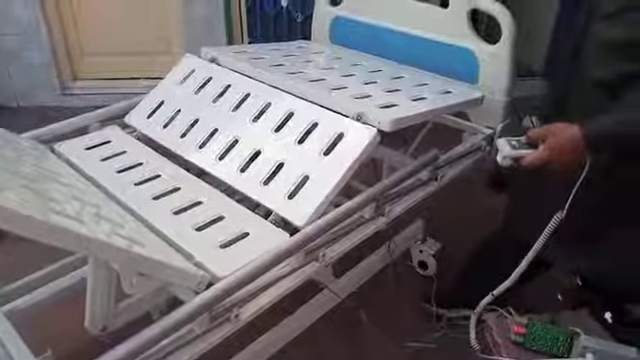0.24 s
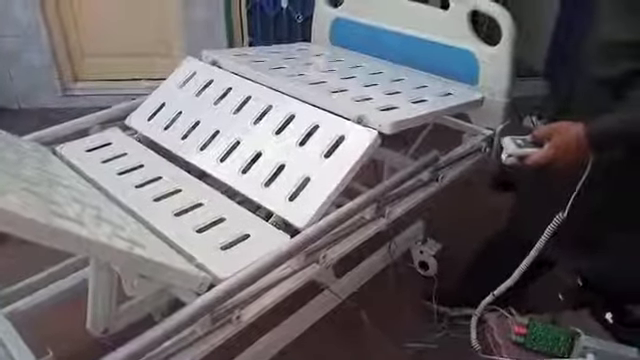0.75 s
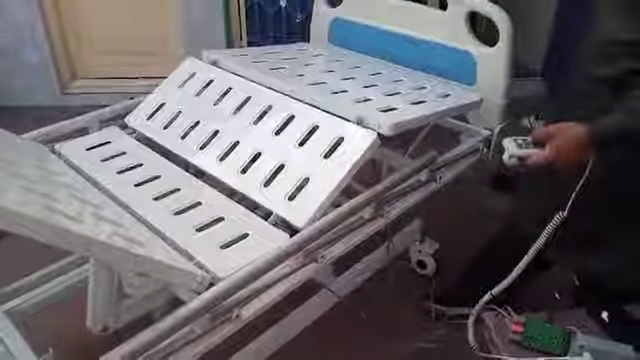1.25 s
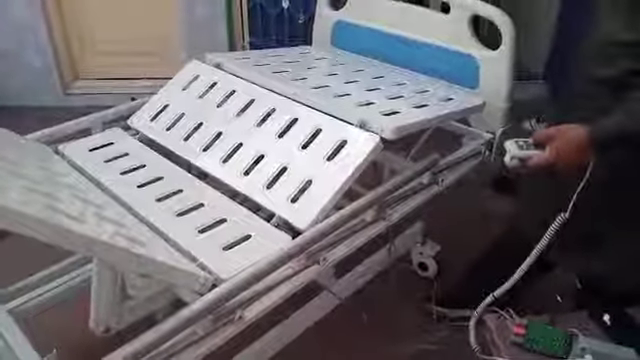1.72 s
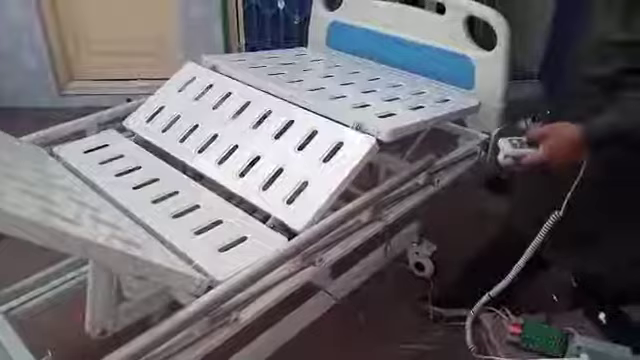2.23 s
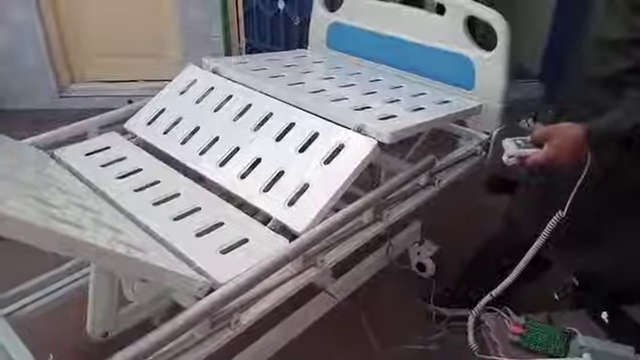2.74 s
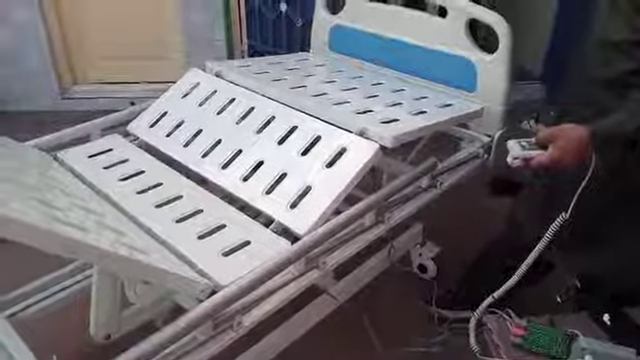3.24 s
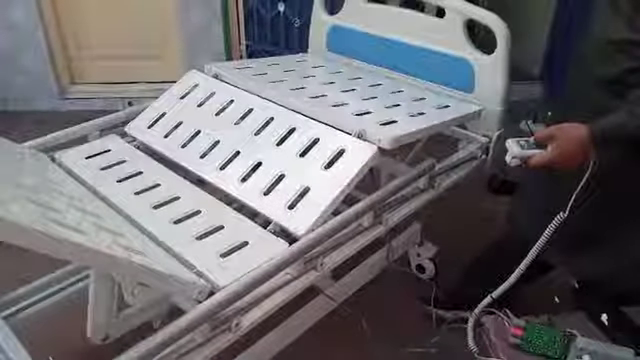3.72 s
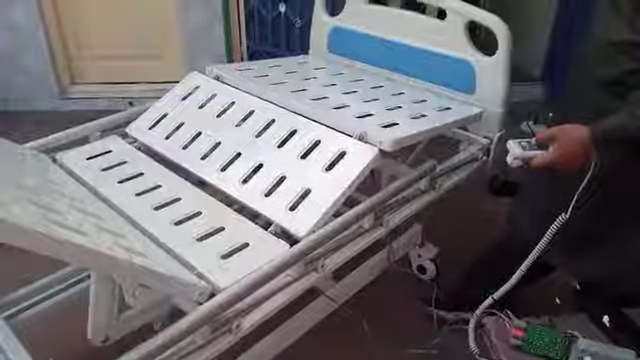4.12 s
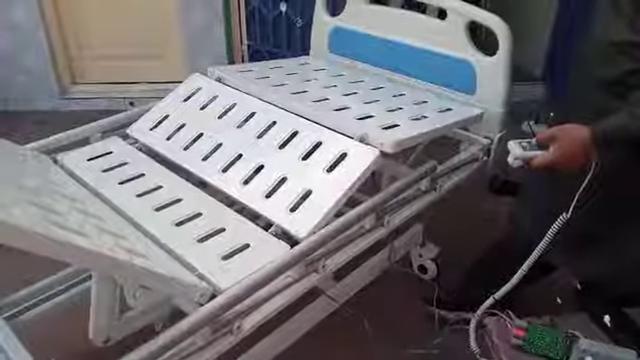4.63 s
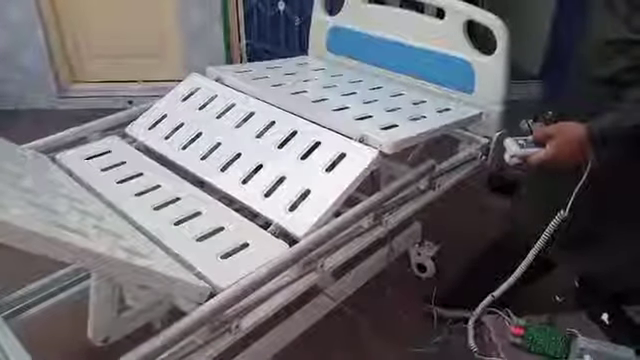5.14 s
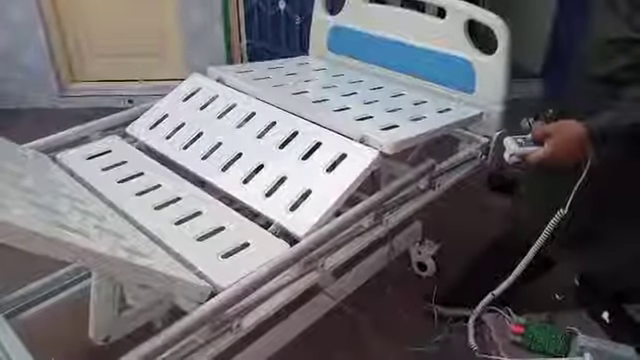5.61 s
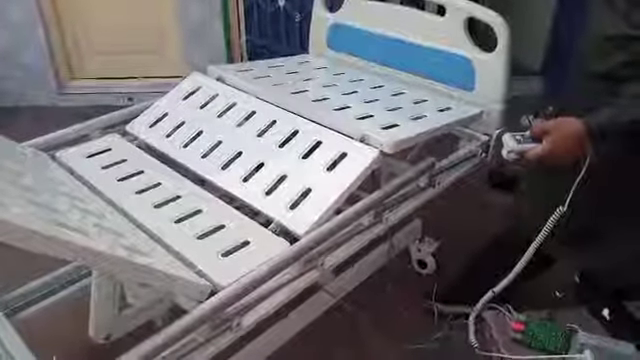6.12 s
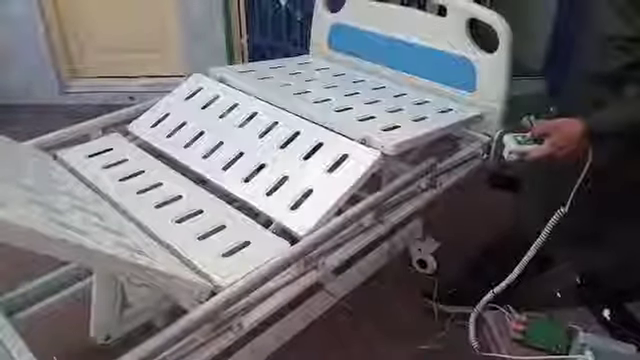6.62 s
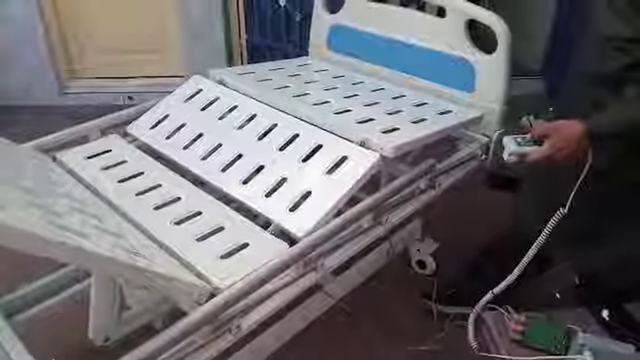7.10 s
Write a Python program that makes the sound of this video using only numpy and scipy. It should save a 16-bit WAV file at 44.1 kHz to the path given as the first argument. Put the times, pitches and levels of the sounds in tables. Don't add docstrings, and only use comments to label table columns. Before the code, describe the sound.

An electric bed motor drones steadily in a hard room, its steel frame humming and rattling under gear whine and gritty hiss.

```python
import sys
import numpy as np
from scipy import signal
from scipy.fft import rfft, irfft
from scipy.io import wavfile
from scipy.ndimage import uniform_filter1d

SR = 44100
rng = np.random.default_rng(int(sys.argv[2]) if len(sys.argv) > 2 else 0)


def output_pcm(signal):
    pcm = np.clip(np.atleast_2d(signal).T, -1, 1) * 32767
    wavfile.write(sys.argv[1], SR, np.round(pcm).astype(np.int16))


def gain_from_db(level_db):
    decades = np.asarray(level_db, float) / 20
    return 10 ** decades


N = 324576


def spells(rows, fade_s):
    t = np.arange(N) / SR
    total = 0
    for start, length, value in rows:
        to_nearest_end = np.minimum(t - start, start + length - t)
        total = total + value * np.clip(.5 + to_nearest_end / fade_s, 0, 1)
    return total


def drift(rate):
    r = np.exp(-128 * np.pi * rate / SR)
    noise = rng.standard_normal(N // 64 + 2002)
    slow = signal.lfilter([1], [1, -2 * r, r * r], noise)[2000:]
    return np.interp(np.arange(N) / 64, np.arange(len(slow)), slow / np.std(slow))


def at_hz(points, hz):
    f, value = np.transpose(points)
    return np.interp(np.log(hz), np.log(f), value)


# (t/s, speed/turns per s)
SHAFT_SPEED = [(0.0, 29.66), (0.43, 29.576), (0.73, 29.297), (0.95, 29.385), (1.55, 29.507), (2.26, 29.473),
               (2.46, 29.578), (2.98, 29.408), (3.29, 29.591), (4.05, 29.577), (4.33, 29.884),
               (4.94, 29.982), (4.99, 29.824), (5.58, 29.829), (5.91, 29.631), (6.34, 29.703),
               (6.9, 29.269), (7.36, 29.291)]


def shaft():
    t, turns_per_s = np.transpose(SHAFT_SPEED)
    speed = np.interp(np.arange(N) / SR, t, turns_per_s)
    return speed, -.097 + np.cumsum(speed) / SR


def knock_phases(levels_db):
    log_size = np.log(gain_from_db(levels_db))
    tail = log_size[-1] - .3 * np.arange(18)
    cepstrum = irfft(np.r_[log_size[0] - 1, log_size, tail])
    half = len(cepstrum) // 2
    cepstrum[1:half] *= 2
    cepstrum[half + 1:] = 0
    return rfft(cepstrum).imag[1:len(levels_db) + 1]


SLAT_TONES = [
    (43,),
    (34, 36),
    (19, 23, 25),
    (27, 32, 37, 41),
    (31, 33, 37, 39),
    (24, 32, 41, 43),
]
SLAT_REST = [0.32, -1.3, -0.0016, -0.38, -0.32, -0.24]
# (start t/s, length t/s, extra level/dB)
HIGH_SPELLS = [
    (4.197, 0.17, 3.5),
    (4.474, 0.82, -7),
    (5.066, .78, 4),
]
MIDDLE_SPELLS = [
    (4.2, 0.086, 8.5),
    (4.42, 0.45, -2.5),
    (5.07, 0.81, 3),
    (5.84, .76, 7.5),
    (6.65, .8, 2.5),
]
LOW_SPELLS = [
    (0, 0.5, -0.5),
    (.6, 1.6, -4.5),
    (4.25, .75, 1),
    (5.05, .75, 0.5),
    (6.62, .8, 2.5),
]
SIDE_SPELLS = [
    (0, 0.49, 2),
    (.7, 1.7, -2),
    (5.8, 0.81, 3.5),
]
INNER_SPELLS = [
    (4.2, 0.73, 0.5),
    (5.05, 0.86, 3.5),
    (5.84, .7, 0.67),
]
EDGE_SPELLS = [
    (0, .55, 3.6),
    (4.3, .7, 3),
    (5.05, 0.67, 2.5),
]


def slats():
    groups = (HIGH_SPELLS, MIDDLE_SPELLS, LOW_SPELLS, SIDE_SPELLS, INNER_SPELLS, EDGE_SPELLS)
    return [rest_db + spells(rows, .095) for rest_db, rows in zip(SLAT_REST, groups)]


# (order/tones per turn, normal load level/dB, light load level/dB, heavy load level/dB)
FRAME_HUM = [(1, -58, -57, -61), (2, -44, -42, -43), (3, -52, -53, -51), (4, -27.5, -26, -28),
             (5, -20, -22.5, -21), (6, -31, -40, -30), (7, -29, -29, -28), (8, -33, -32, -34),
             (9, -28, -29, -34), (10, -39, -40, -35), (11, -31, -33, -29.5), (12, -36, -32, -40),
             (13, -43, -37, -48), (14, -39, -41, -40), (15, -48, -48, -41), (16, -52, -51, -61)]
PANEL_RATTLE = [(17, -53, -45, -58), (18, -44, -58, -40), (19, -42, -37, -47), (20, -50, -43, -49),
                (21, -43, -34, -41), (22, -47, -56, -40), (23, -38, -31.5, -41), (24, -45, -37, -53),
                (25, -40.5, -32, -33.5), (26, -46, -54, -39), (27, -32, -32, -28), (28, -41, -54, -37),
                (29, -34.5, -32, -39.5), (30, -41, -35, -41), (31, -31, -41, -30), (32, -45, -39, -50),
                (33, -34.5, -38, -44), (34, -39, -33, -36), (35, -47, -45, -48), (36, -38, -37, -32),
                (37, -44, -36, -36), (38, -42, -48, -33), (39, -39, -39, -41), (40, -45, -41, -42),
                (41, -38, -37, -41), (42, -45, -44, -37), (43, -39, -32, -38), (44, -41, -43, -39),
                (45, -44, -43, -56), (46, -44, -43, -40), (47, -41, -50, -46), (48, -40, -42, -46),
                (49, -48, -43, -49), (50, -46, -44, -45), (51, -45, -49, -47), (52, -44, -42, -41),
                (53, -43, -50, -42)]
LOAD_SPEEDS = [29.35, 29.46, 29.6, 29.8]
TONE_LEAD = {2: 3.4, 5: .8, 9: 1.0, 12: .9, 25: -.7, 29: .8, 31: -.6}
FLOOR_ECHO = [(3, -.55), (5, .55), (7, .9), (11, .4)]
PANEL_DELAY = [(17, .05), (22, .06), (25, .035), (46, .03)]


def frame(speed, turn):
    tones = np.array(FRAME_HUM + PANEL_RATTLE)
    hums = len(FRAME_HUM)
    panels = tones[hums:, 0]
    phases = knock_phases(np.maximum(tones[:, 1], -50))
    phases += np.interp(tones[:, 0], *np.transpose(FLOOR_ECHO))

    late = -2 * np.pi * np.cumsum(np.interp(panels, *np.transpose(PANEL_DELAY)))
    late += .1 - late[10]
    scatter_rad = np.where(panels % 2 == 1, .45, 1.4)
    scatter_rad[panels > 33] = 1.0
    phases[hums:] = late + scatter_rad * rng.standard_normal(len(panels))

    uneven = drift(9)
    slats_db = slats()
    lag = np.interp(speed, [29.3, 29.5, 29.7], [.085, 0, -.02])
    out = 0
    for (order, normal_db, light_db, heavy_db), phase in zip(tones, phases):
        rattles = order > hums
        load_levels = [heavy_db, normal_db, normal_db, light_db - .8 * rattles]
        level_db = np.interp(speed, LOAD_SPEEDS, load_levels)
        level_db += (.7 if order > 5 else .5) * uneven
        level_db += .6 * rattles - 1.0 * (order > 36)
        level_db += (.35 + .008 * order) * drift(2)
        level_db += sum(db for db, sung in zip(slats_db, SLAT_TONES) if order in sung)
        phase += TONE_LEAD.get(order, 0)
        phase = phase + order * (.008 * drift(.7) - lag * (order > 5))
        out = out + gain_from_db(level_db) * np.cos(2 * np.pi * order * turn + phase)
    return out


# (order/tones per turn, level/dB)
TOOTH_LINES = [(64, -36.5), (66, -40.5), (67, -36.5), (68, -36), (70, -40.5), (71, -37), (76, -41.5),
               (88, -40.5), (92, -38), (114, -39.5), (152, -38), (161, -47), (190, -46), (215, -38)]
# (start t/s, length t/s, extra level/dB)
EARLY_TOOTH = [
    (0, 1.7, 5),
    (1.7, .7, 2.5),
]
HIGHEST_TOOTH = [
    (1.2, 1.8, 5),
    (6.6, .8, 2),
]


def gears(turn):
    swells_db = {114: spells(EARLY_TOOTH, .3), 215: spells(HIGHEST_TOOTH, .3)}
    out = 0
    for order, db in TOOTH_LINES:
        level_db = db + 1.5 * drift(2.3) + swells_db.get(order, 0)
        phase = 1.9 * drift(2.88) + order
        out = out + gain_from_db(level_db) * np.cos(2 * np.pi * order * turn + phase)
    return out


def repeating(turn):
    size, likeness = 1500, .97
    fresh = rng.standard_normal((260, size))
    turns = signal.lfilter([np.sqrt(1 - likeness ** 2)], [1, -likeness], fresh, axis=0)
    return turns.ravel()[((turn + 20) * size).astype(int)]


# (f/Hz, width f/Hz, place/turns, length/turns, lift level/dB)
RUBBED_PLACES = [(5500, 500, .64, .04, 1.5), (4800, 400, .02, .045, 3), (4800, 400, .35, .045, 3),
                 (4800, 400, .67, .05, 3), (6500, 900, .84, .03, 2.5), (3300, 700, .1, .035, 4),
                 (2700, 500, .09, .035, 7), (2700, 500, .4, .04, 4.5), (2050, 600, .55, .05, 6.5),
                 (2050, 600, .14, .08, 4), (5500, 500, .0, .04, 3), (6600, 900, .1, .025, 3.5),
                 (1200, 400, .72, .04, 4), (1200, 400, .04, .05, 2.5)]


def scuffs(turn):
    lifts = []
    for _, _, place, length, db in RUBBED_PLACES:
        ahead = turn - place + .5
        strength = np.maximum(1 + .2 * rng.standard_normal(300), 0)
        bite = strength[(ahead + 2).astype(int)]
        lifts.append(db * bite * np.exp(-.5 * ((ahead % 1 - .5) / length) ** 2))
    return np.array(lifts)


# (f/Hz, level/dB per Hz)
HISS_COLOUR = [(40, -23.5), (100, -10), (300, -0.5), (480, -8), (750, 0), (1250, -1.5), (1650, -6.5),
               (2400, -3), (3600, -4.5), (5000, -3.5), (6300, -1.5), (7200, -2), (7550, -9.5),
               (8100, -21.5)]
# (f/Hz, width f/Hz, lift level/dB)
HOUSING_RINGS = [(998, 150, -4), (1990, 150, 5), (2200, 52, 3.5), (2660, 310, 2), (2770, 45, 0.5),
                 (3080, 39, 1), (3700, 73, 0), (4000, 54, 5), (4360, 31, -4), (4750, 80, 6.5),
                 (4870, 65, 4), (5800, 120, -2), (6520, 82, 4), (7140, 90, 1), (3210, 60, 3),
                 (3630, 110, 0), (5280, 71, 5.5), (5510, 110, 3.5), (6090, 160, 2.5), (6340, 78, 2.5),
                 (6820, 110, 3.5), (6800, 80, -3), (7955, 81, 8.5), (7500, 50, -5.5)]
# (f/Hz, share/0-1)
REPEATING_SHARE = [(500, .03), (1400, .06), (1700, .6), (2700, .5), (3300, .42), (3800, .3), (5300, .4),
                   (7200, .3)]


def grit(speed, turn):
    level_db = -20.5 + .5 * (speed - speed.mean())
    hz = np.maximum(np.fft.rfftfreq(N, 1 / SR), 1)
    colour_db = at_hz(HISS_COLOUR, hz)
    for f, width, db in HOUSING_RINGS:
        colour_db = colour_db + db / (1 + (2 * (hz - f) / width) ** 2)
    share = at_hz(REPEATING_SHARE, hz)
    white = np.sqrt(1 - share) * rfft(rng.standard_normal(N))
    white += np.sqrt(share) * rfft(repeating(turn))
    coloured = white * gain_from_db(colour_db) * (hz < 8400)
    coloured /= np.std(irfft(coloured * (hz > 1500), N))

    centres = np.r_[1, 150, 400, np.arange(700, 8900, 300)]
    around = np.linspace(0, 1, 129)
    spot_phases = np.cumsum(1.1 * rng.standard_normal((len(centres), 5)), axis=0)
    surge, lifts_db = drift(5), scuffs(turn)
    lifts_db -= lifts_db.mean(axis=1, keepdims=True)
    out = 0
    for k, centre in enumerate(centres):
        band_shape = np.interp(hz, centres, np.arange(len(centres)) == k)
        band = irfft(coloured * band_shape, N)
        spots = np.cos(2 * np.pi * np.outer(around, np.arange(1, 6)) + spot_phases[k]).sum(axis=1)
        gain_db = .4 * drift(.7) + .8 * drift(7) + .45 * surge
        gain_db += .22 * np.interp(turn % 1, around, spots)
        nearness = [1 / (1 + (2 * (centre - f) / width) ** 4) for f, width, *_ in RUBBED_PLACES]
        gain_db += np.array(nearness) @ lifts_db
        out = out + gain_from_db(gain_db - .74 * (centre < 1500)) * band
    return gain_from_db(level_db - .5) * out


# (start t/s, length t/s, extra level/dB)
TICK_SPELLS = [
    (0, .35, -5.5),
    (2.3, 0.71, 1.5),
    (6.55, .9, 3),
]


def brush_tick(speed, turn):
    late = -.09 * (speed - speed.mean())
    ahead = turn - .63 - late + .5
    bite_db = 1.5 * rng.standard_normal(300)[(ahead + 2).astype(int)]
    around = ahead % 1 - .5
    ring = np.exp(-.5 * (around / .045) ** 2) * np.cos(2 * np.pi * 188.5 * around)
    return gain_from_db(-24.5 + bite_db + spells(TICK_SPELLS, .2)) * ring


def scene():
    speed, turn = shaft()
    mix = frame(speed, turn) + gears(turn) + grit(speed, turn) + brush_tick(speed, turn)
    return np.tile(mix, (2, 1))


# (from f/Hz, to f/Hz, drop below/supply)
WEAK_BANDS = [(7480, 7650, -2.1), (7650, 7820, -1.7), (7820, 7950, -1.3), (7950, 8050, -.9),
              (8050, 8125, -.4), (8125, 9000, 9)]
# (start t/s, length t/s, change/supply)
LEAN_SPELLS = [
    (0, 1.05, -.35),
    (1.1, .2, -.9),
    (3.42, .32, -2),
    (4.2, 1.5, .5),
    (5.9, .4, -.45),
]


def starve(x):
    block = 1412
    hz, spectrum = np.fft.rfftfreq(N, 1 / SR), rfft(x)
    supply = spells(LEAN_SPELLS, .12) - .15 + .3 * drift(2.5) + .75 * drift(15)
    supply = supply[::block]
    lost = 0
    for low, high, threshold in WEAK_BANDS:
        dropped = supply + .55 * rng.standard_normal(len(supply)) < threshold
        dropped = np.repeat(1. * dropped, block)[:N]
        band = irfft(spectrum * (hz >= low) * (hz < high), N)
        lost = lost + uniform_filter1d(dropped, size=600) * band
    return x - lost


def roll_off(x):
    return signal.sosfilt(signal.butter(12, 8470, fs=SR, output="sos"), x)


def record(dry):
    rounded = .78 * np.tanh(dry / .74)
    mix = starve(rounded)
    return roll_off(mix)


dry = scene()
out = record(dry)
output_pcm(out)
```